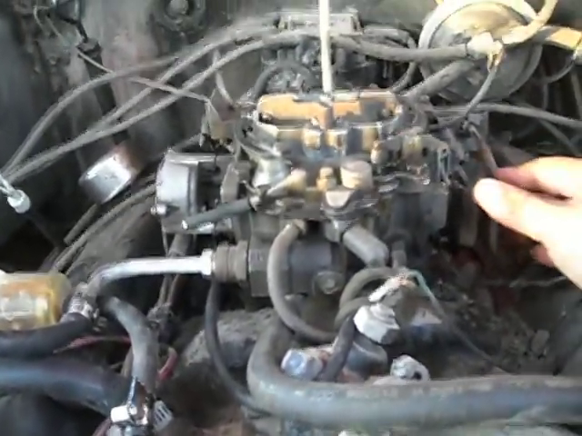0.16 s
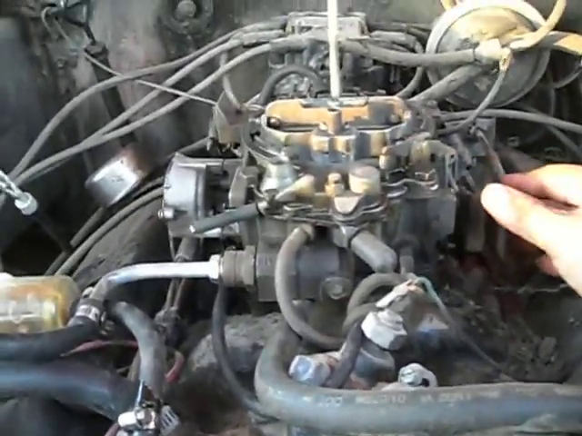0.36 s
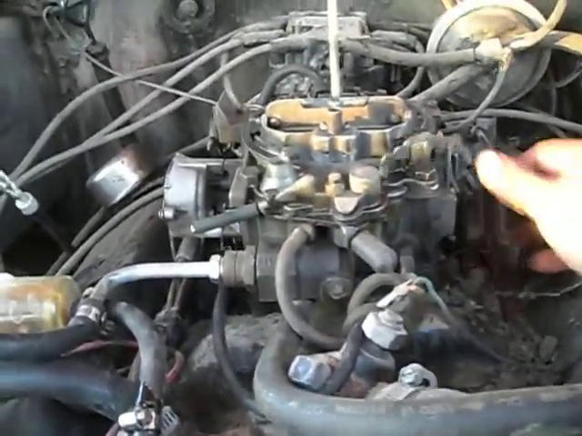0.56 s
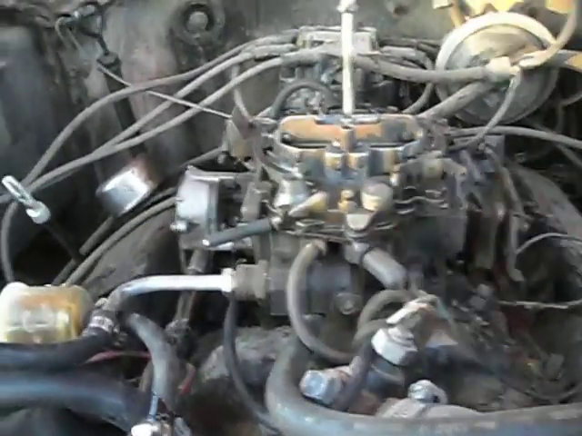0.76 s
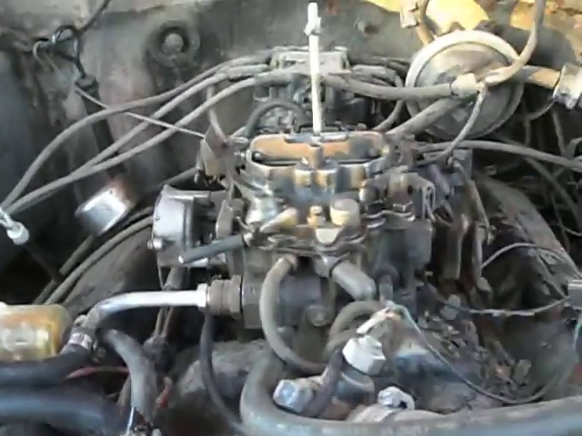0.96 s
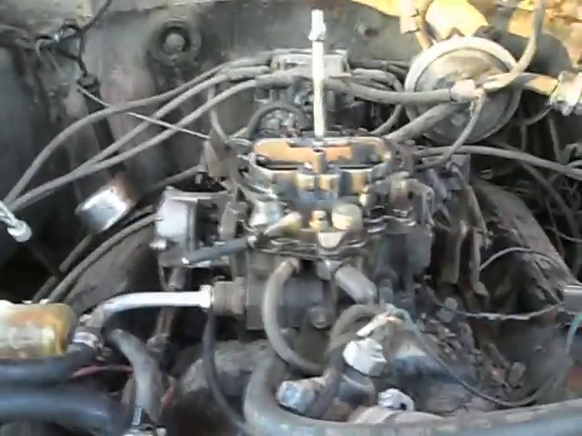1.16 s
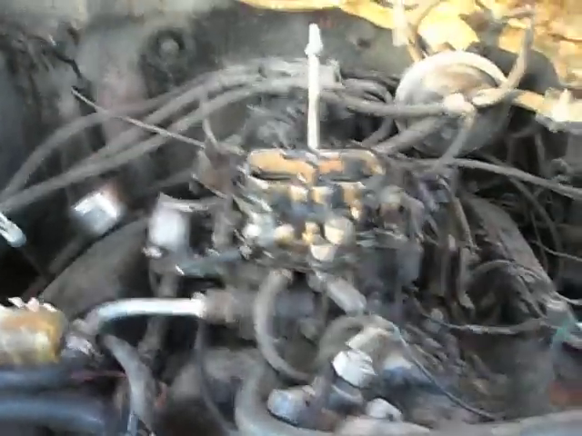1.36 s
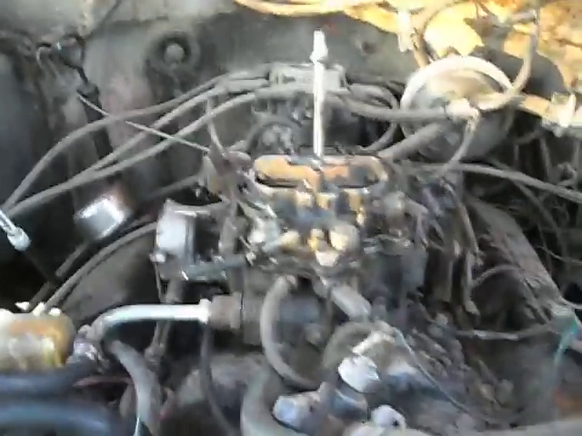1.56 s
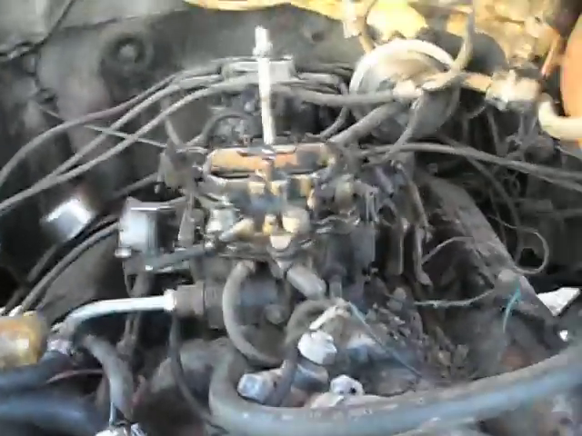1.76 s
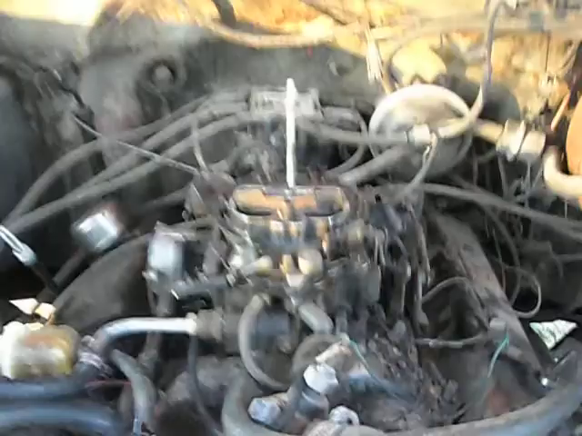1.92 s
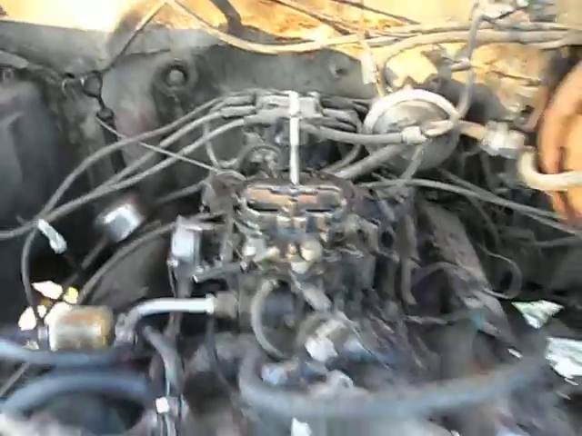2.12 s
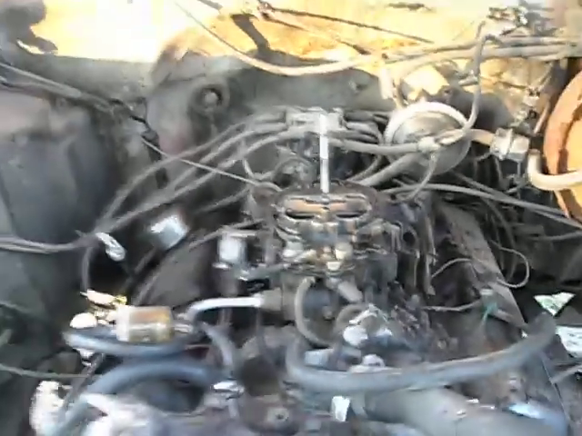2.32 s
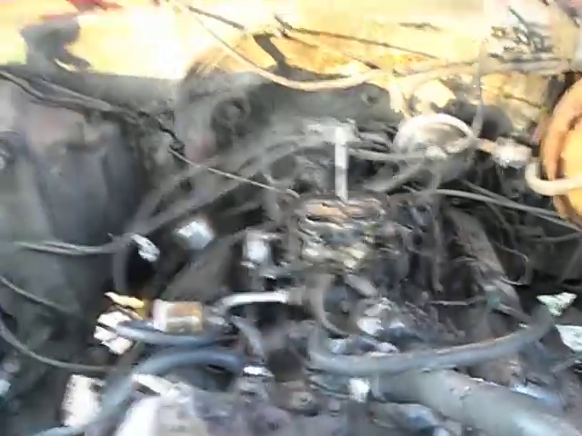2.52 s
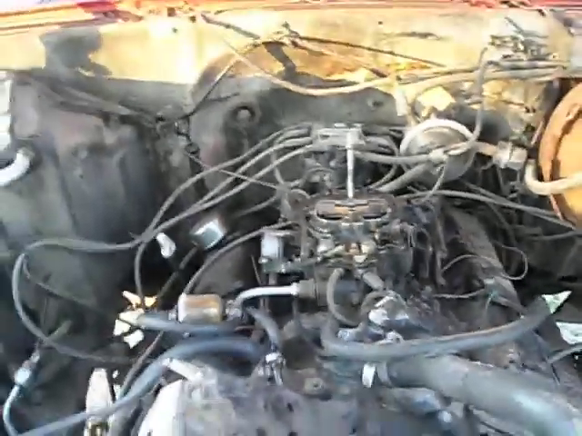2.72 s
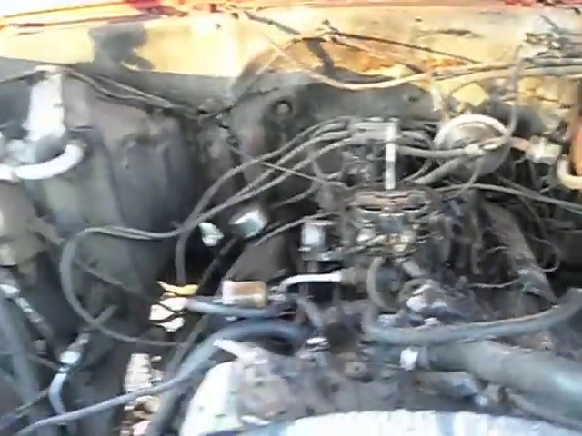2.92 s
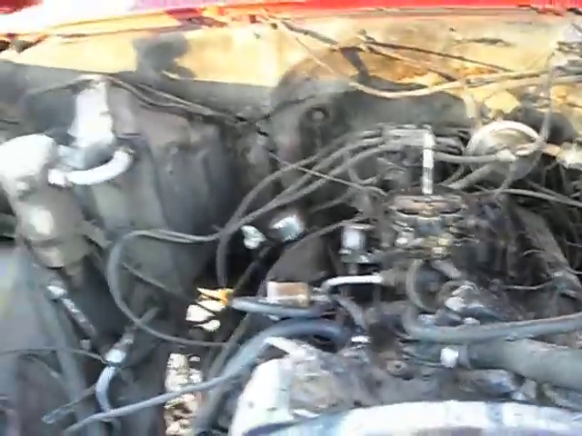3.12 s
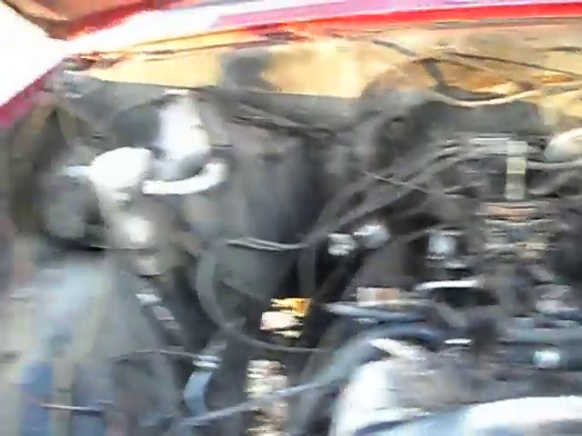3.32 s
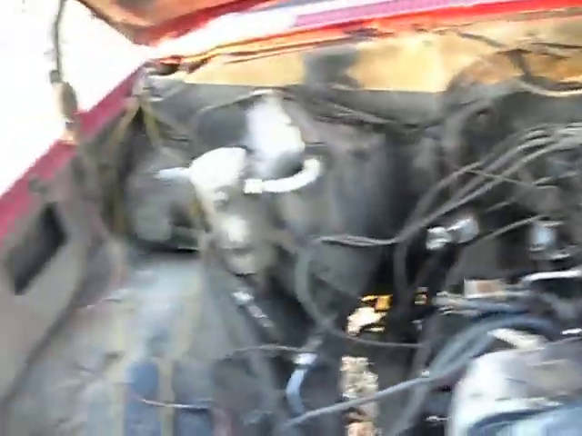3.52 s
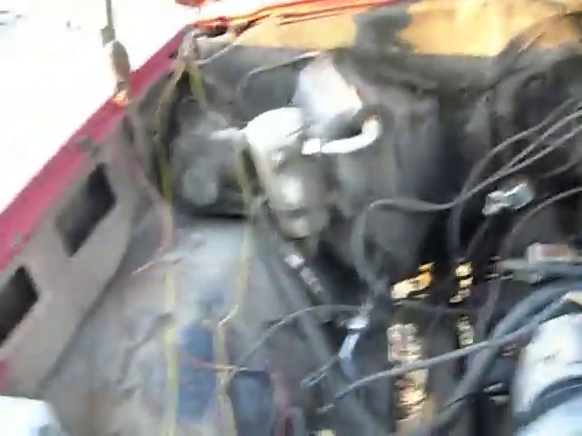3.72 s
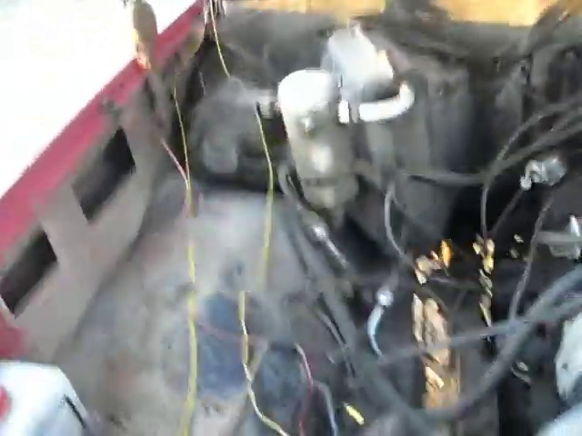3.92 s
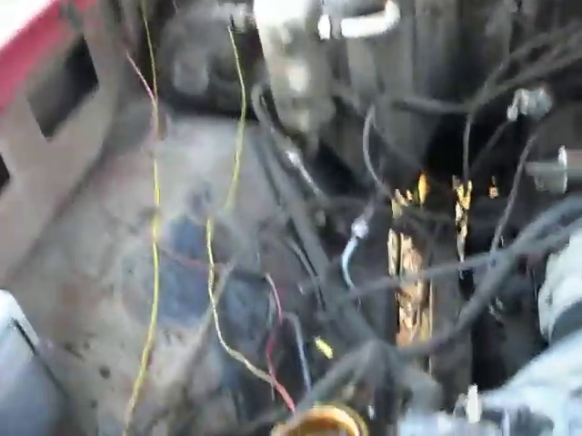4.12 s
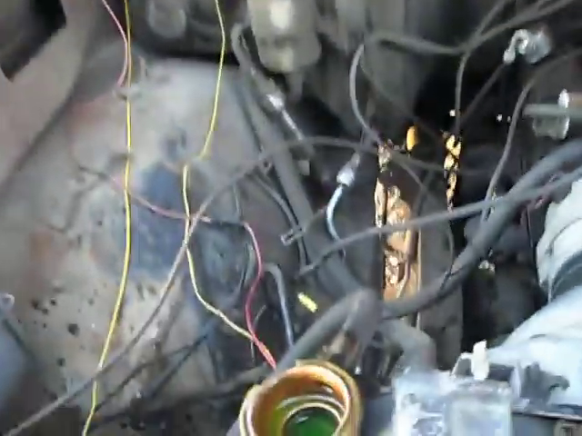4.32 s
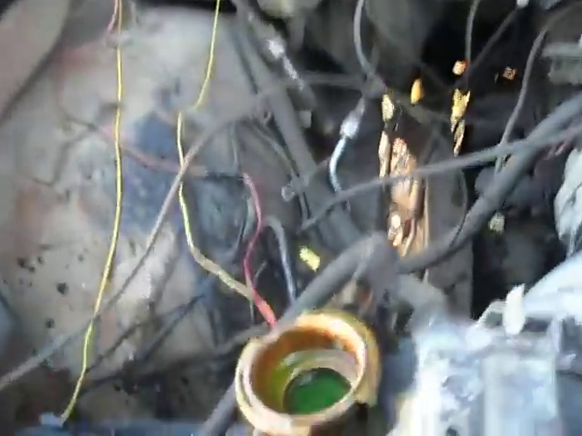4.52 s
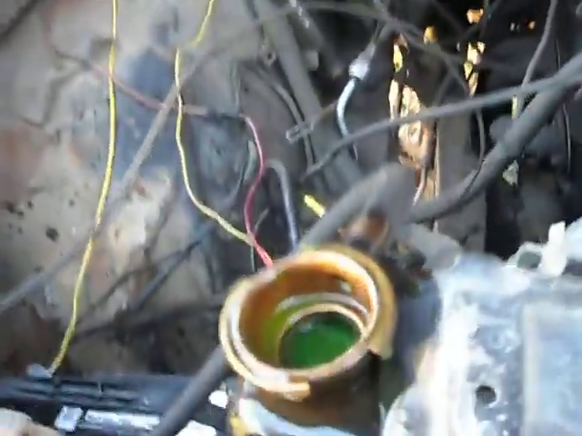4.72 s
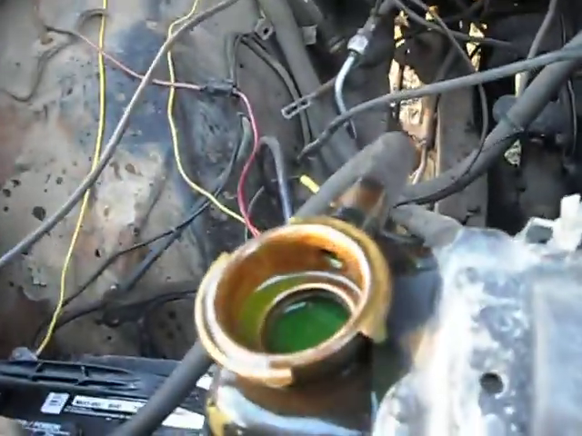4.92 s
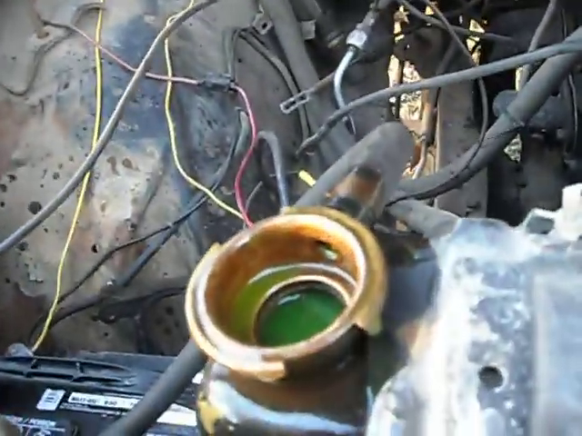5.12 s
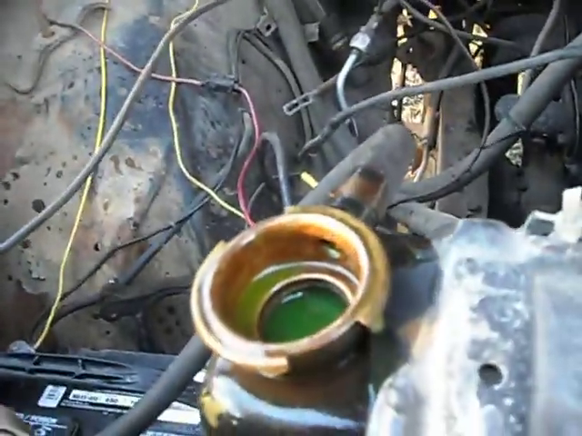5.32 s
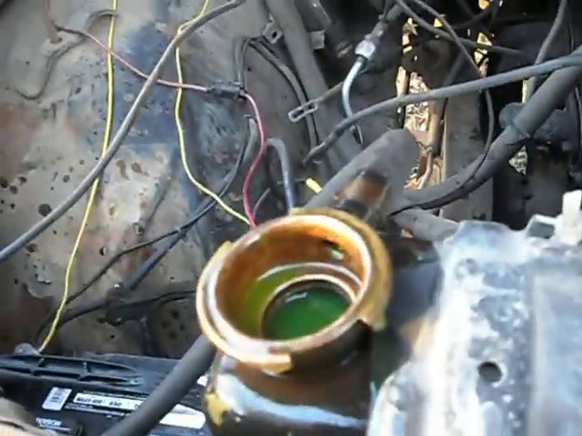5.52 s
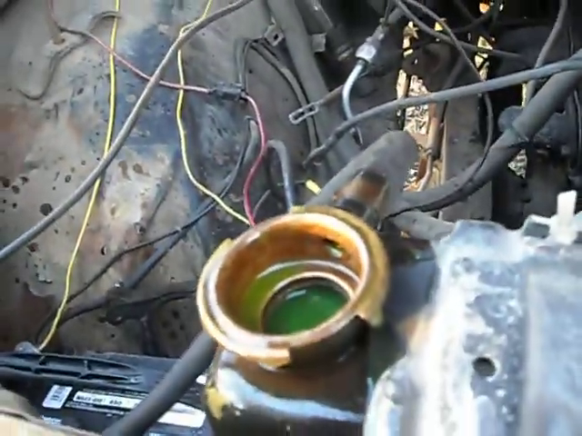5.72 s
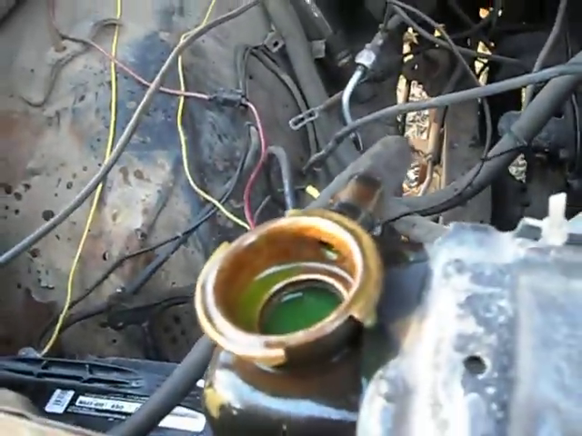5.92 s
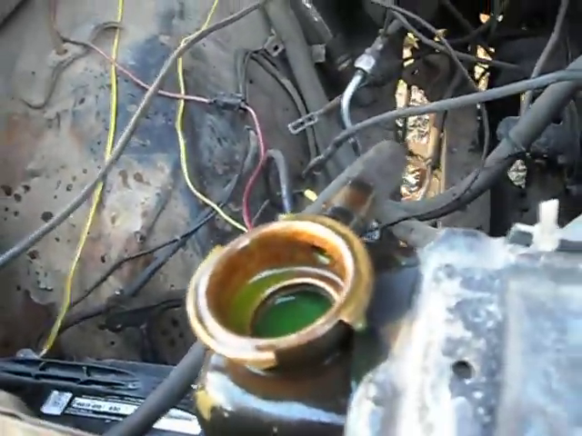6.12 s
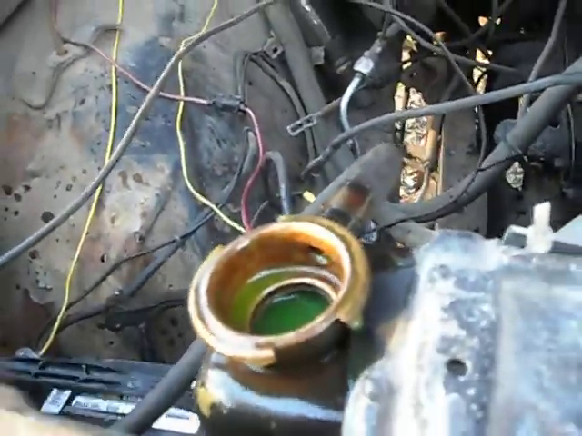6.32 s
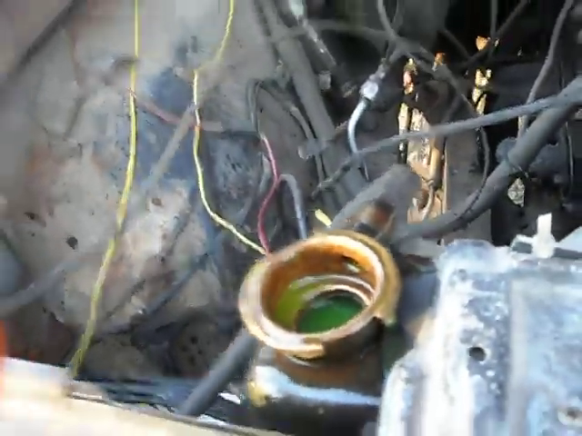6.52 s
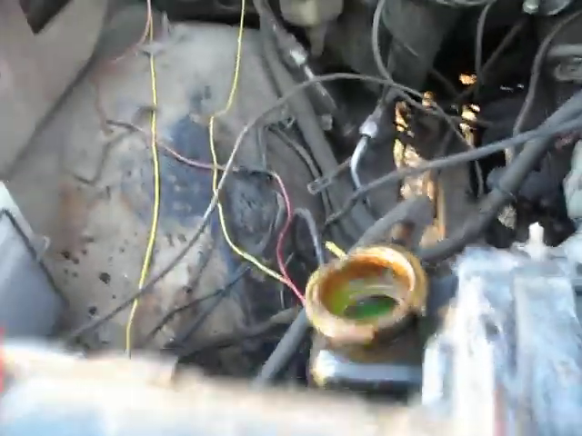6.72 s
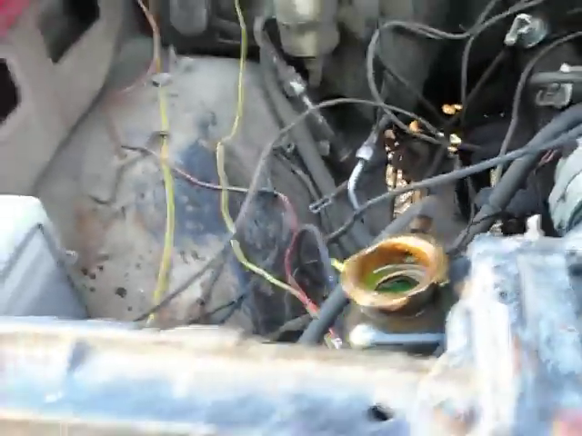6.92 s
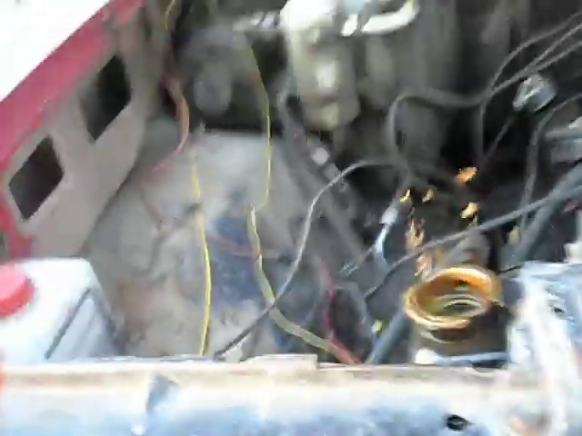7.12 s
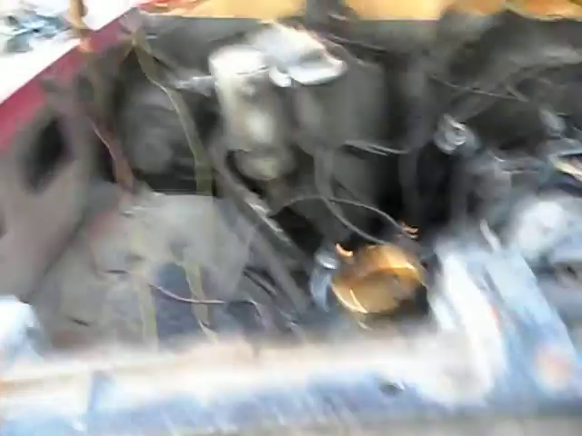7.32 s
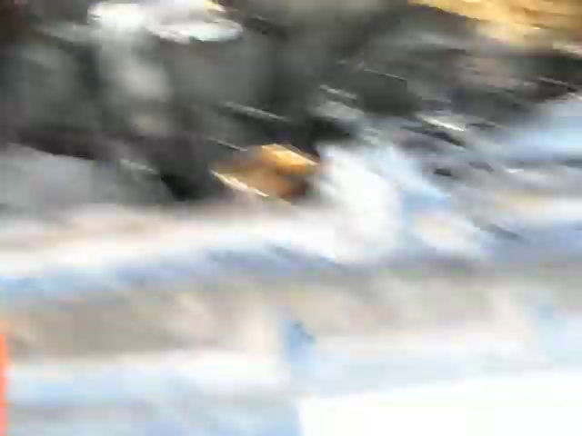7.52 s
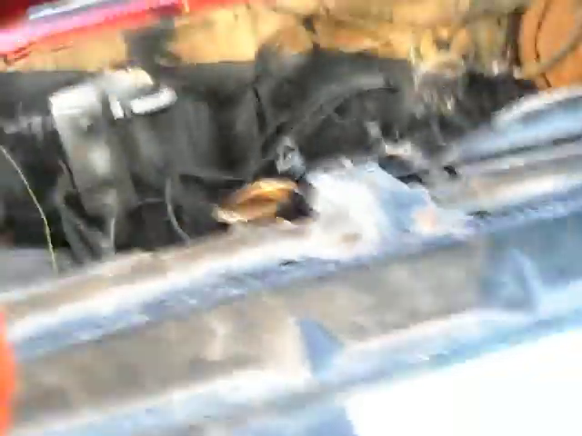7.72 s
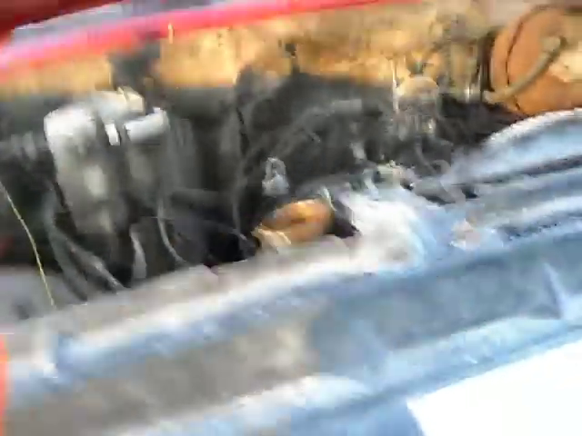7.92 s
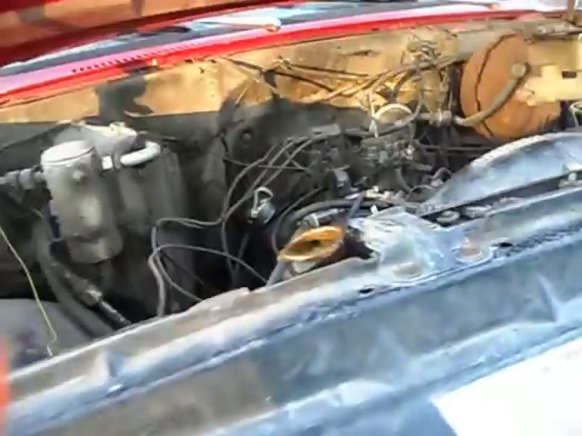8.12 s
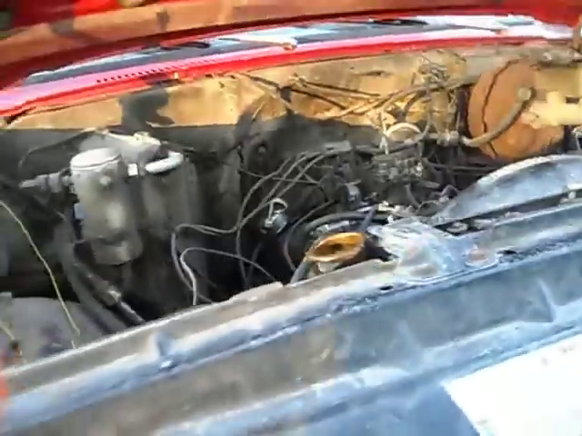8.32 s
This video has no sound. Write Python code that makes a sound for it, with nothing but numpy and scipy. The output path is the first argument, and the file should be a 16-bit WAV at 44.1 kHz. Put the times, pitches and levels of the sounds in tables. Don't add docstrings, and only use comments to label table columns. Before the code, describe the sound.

Close in an open engine bay, a big petrol V8 gets two short throttle blips, each a throaty roar with a bright gulp of air. Pops and crackles follow as revs fall, then a deep, lumpy idle throbs steadily with body knocks, carburettor hiss and faint whistles. The small handheld microphone distorts on the blips and dips in level after strong beats.

```python
import sys
import numpy as np
from scipy import signal
from scipy.io import wavfile
from scipy.ndimage import uniform_filter1d, minimum_filter1d

SR = 44100
rng = np.random.default_rng(int(sys.argv[2]) if len(sys.argv) > 2 else 0)


def transcribe(u):
    v = np.clip(np.atleast_2d(u).T, -1, 1)
    q = np.round(v * 32767).astype(np.int16)
    wavfile.write(sys.argv[1], SR, q)


def volts_from_db(level):
    exponent = np.asarray(level, float) / 20
    return 10 ** exponent


N = 373086
SECONDS = np.arange(N) / SR
IDLE_FIRING_HZ = 63


def rms_one(x):
    return x / np.sqrt(np.mean(x ** 2) + 1e-20)


def in_time(rows):
    s, *columns = np.transpose(rows)
    return [np.interp(SECONDS, s, c) for c in columns]


def noise():
    return rng.standard_normal(N)


def butter(x, hz, kind, order=2):
    return signal.sosfilt(signal.butter(order, hz, kind, fs=SR, output="sos"), x)


def resonate(x, hz, width_hz):
    r = np.exp(-np.pi * width_hz / SR)
    gain = (1 - r * r) / 2
    return signal.lfilter([gain, 0, -gain], [1, -2 * r * np.cos(2 * np.pi * hz / SR), r * r], x)


def sliding(x, hz, width_hz):
    r, out, state = np.exp(-np.pi * width_hz / SR), np.zeros(N), np.zeros(2)
    for i in range(0, N, 512):
        a = [1, -2 * r * np.cos(2 * np.pi * hz[i] / SR), r * r]
        out[i:i + 512], state = signal.lfilter([1, 0, -1], a, x[i:i + 512], zi=state)
    return rms_one(out)


def drift(rate):
    knots = rng.standard_normal(int(N / SR * 60) + 2)
    knots = rms_one(signal.lfilter([1], [1, -np.exp(-2 * np.pi * rate / 60)], knots))
    return np.interp(SECONDS * 60, np.arange(len(knots)), knots)


def coloured(spectrum, patchy_db):
    hz, level_db = np.transpose(spectrum)
    edges = np.geomspace(hz[0], hz[-1], int(2.3 * np.log2(hz[-1] / hz[0])))
    white, together, out = rng.standard_normal((2, N)), drift(45), 0
    for k, (low, high) in enumerate(zip(edges, edges[1:])):
        band_db = np.interp(np.log(low * high) / 2, np.log(hz), level_db)
        flicker_db = patchy_db * (together + 1.9 * drift(6.9))
        out = out + volts_from_db(band_db + flicker_db) * butter(white[k % 2], [low, high], "band")
    return rms_one(out)


# time in seconds, firings per second.
SPEED = [(0.0, 99.16), (0.12, 122.99), (0.52, 89.85), (0.6, 132.24), (0.7, 126.68), (0.95, 104.48),
         (1.2, 90.39), (1.45, 64.65), (2.1, 62.68), (4.2, 62.39), (4.6, 64.02), (5.24, 62.53),
         (5.85, 64.04), (6.26, 62.59), (6.9, 64.03), (7.28, 62.49), (7.9, 65.52), (8.46, 63.45)]


def firing_count():
    return np.cumsum(in_time(SPEED)[0]) / SR + 7.786


# time in seconds, exhaust pressure over idle in dB, unsettled running 0-1.
RUNNING = [(0, 14, 0.8), (.13, 10, 1), (.2, 15, 1), (.25, 4.5, 0.95), (.5, 9.5, 0.98), (.62, 11.5, 0.9),
           (.75, 10, 1), (.95, 8, 1), (1.1, 10.5, 0.83), (1.2, 4.5, 1), (1.3, 0.5, 0.84), (1.7, -0.5, 0.78),
           (2.0, 0, 0.52), (2.35, 1, 0.28), (3.3, 0.76, 0.11), (7.3, -0.74, 0), (7.85, 2.3, 0.55),
           (8.46, -0.3, 0.1)]


def low_layer(idle_db, follows, unsettled_db):
    pressure_db, unsettled = in_time(RUNNING)
    return idle_db + follows * pressure_db + unsettled_db * unsettled


# widest opening in seconds, strength in dB.
BLIPS = [
    (.03, -2),
    (.615, 0),
]
# seconds from widest opening, intake roar in dB, air rush in dB.
BLIP_SHAPE = [
    (-.16, -40, -53),
    (-.115, -25, -34),
    (-.065, -15, -30.5),
    (-.04, -2.5, -16.5),
    (.03, 2, -16),
    (.06, -5, -29),
    (.17, -5.5, -32.5),
    (.27, -15.5, -39.5),
    (.9, -30, -48.5),
]


def throttle():
    after, *shapes_db = np.transpose(BLIP_SHAPE)
    levels_db = []
    for shape_db in shapes_db:
        each_db = [db + np.interp(SECONDS - s, after, shape_db) for s, db in BLIPS]
        levels_db.append(np.max(each_db, axis=0))
    return levels_db


# frequency in Hz, level in dB per Hz.
ROAR = [(100, -9.5), (170, -4.5), (312, 0), (471, -14.5), (634, -8.5), (680, -10), (806, -11.5),
        (2840, -26.5), (5000, -32.5), (6500, -68), (11000, -120)]
# frequency in Hz, level in dB per Hz.
RUSH = [(880, -31), (1500, -7), (1590, -2), (2150, -13.5), (2600, -10), (7130, -17.5), (9950, -20),
        (11000, -24), (14300, -55), (22000, -120)]


def intake_blip(count):
    roar_db, rush_db = throttle()
    closing = np.clip((1.9 - SECONDS) / 0.85, 0, 1)
    each_db = np.interp(count, np.arange(700), rng.standard_normal(700))
    gulp = volts_from_db(2.5 * np.cos(2 * np.pi * count) + 1.6 * each_db)
    roar = volts_from_db(roar_db - 3.5) * coloured(ROAR, 1.12)
    rush = volts_from_db(rush_db + 3.5) * coloured(RUSH, 0.45)
    start, end = -.13, .06
    corners = [start, start + .015, end, end + .03]
    cracked = sum(np.interp(SECONDS - at, corners, [0, 1, 1, 0]) for at, _ in BLIPS)
    thin = cracked * butter(noise(), 6000, "high", order=4)
    return closing * gulp * (roar + rush) + volts_from_db(-27) * thin


# lag in firing intervals, strength in dB.
CYLINDERS = [(0.38, -6.9), (-0.11, -0.4), (0.24, -13.0), (0.43, -0.6), (0.5, 8.5), (0.22, 6.2), (0.19, 6.4),
             (-0.14, 10.4)]
# frequency in Hz, width in Hz, level in dB, sign.
PIPES = [
    (105.5, 62.6, -5.4, -1),
    (135, 20.5, 0, 1),
    (190, 61.6, -22, 1),
]


def exhaust(count):
    beat_db = low_layer(-22, 0.92, -6)
    tone_db = low_layer(-23, 1.5, -3)
    buffet_db = low_layer(-47, 0.4349, 29.5)
    uneven_db = low_layer(.65, 0, 1.6)
    number = np.arange(8, int(count[-1]) - 1)
    lag, strength_db = np.array(CYLINDERS)[number % 8].T
    chance = rng.standard_normal((len(number), 2))
    at = np.interp(number, count, np.arange(N)).astype(int)
    late = (lag + 0.017 * uneven_db[at] * chance[:, 0]) * SR / IDLE_FIRING_HZ
    puffs = np.full(N, 1e-18)
    arrival = np.clip(at + late.astype(int), 0, N - 1)
    np.add.at(puffs, arrival, volts_from_db(strength_db + uneven_db[at] * chance[:, 1]))
    puffs = signal.fftconvolve(puffs, np.hanning(151), "same") / in_time(SPEED)[0]
    pipes = sum(sign * volts_from_db(db) * resonate(puffs, hz, width) for hz, width, db, sign in PIPES)
    beat = rms_one(butter(pipes, 80, "high", order=4))
    swell = np.sqrt(2) * volts_from_db(0.67 * uneven_db * drift(4.5))
    tone = swell * np.cos(2 * np.pi * count + 0.42 * drift(4.6))
    buffet = rms_one(butter(noise(), [20, 60], "band"))
    return volts_from_db(beat_db) * beat + volts_from_db(tone_db) * tone + volts_from_db(buffet_db) * buffet


# time in seconds, nearness to the carburettor in dB,
# nearness to the block in dB.
LISTENER = [(1.2, 1.5, 5.5), (1.6, 0.5, 2), (3.7, 0, 0.5), (4.5, -1, 1.5), (5.5, -1.2, 1.5),
            (6.8, -2, -0.5), (7.75, -2, 3), (8.46, -4.5, 0)]
# firing number, frequency in Hz, level in dB,
# share of nearness to the carburettor.
KNOCKS = [
    (.45, 212, -36, 2.4),
    (5.4, 200, -43, 0.1),
    (5.2, 162, -40, 0.1),
    (2.0, 163.5, -38, .1),
]


def shake(count):
    boom_db = low_layer(-29.5, 1.0, 5)
    six_db = low_layer(-59, 2.5, 14.5)
    once_db = low_layer(-64, 1.1, 14)
    number = np.arange(8, int(count[-1]))
    share = np.interp(number / IDLE_FIRING_HZ, [2.3, 2.9], [.4, .8])
    strength = volts_from_db(share * np.array(CYLINDERS)[number % 8, 1])
    pushes = np.full(N, 1e-18)
    pushes[np.searchsorted(count, number)] = strength * rng.choice([-1, 1], len(number))
    boom = rms_one(resonate(resonate(pushes, 87, 26), 90, 50))
    six = volts_from_db(six_db) * np.cos(2 * np.pi * count * 6 / 8)
    once = volts_from_db(once_db) * np.cos(2 * np.pi * count / 8)
    out = volts_from_db(boom_db) * boom + np.sqrt(2) * (six + once)
    cycles = np.arange(1, int(count[-1] / 8))
    receding_db = np.minimum(in_time(LISTENER)[0], 0)
    for firing, hz, db, follows in KNOCKS:
        taps, chance = np.full(N, 1e-18), rng.standard_normal((len(cycles), 2))
        taps[np.searchsorted(count, 8 * cycles + firing + .04 * chance[:, 0])] = volts_from_db(1.8 * chance[:, 1])
        knock = rms_one(resonate(resonate(taps, hz, 30), hz, 49))
        out += volts_from_db(db + follows * receding_db) * knock
    return out


# start in seconds, peak level in dB, brightness in Hz.
POPS = [(.275, -1, 3200), (.305, -14, 1300), (.442, -10.5, 3500), (.475, -12, 900), (.70, -9, 2000),
        (.742, -10, 1500), (.768, -7, 1200), (.812, -8, 1400), (.852, -11, 1200), (.907, -12, 1200),
        (1.007, -14, 900), (1.025, -13, 2200), (1.048, -13, 900), (1.091, -10, 4200), (1.144, -15, 4000),
        (1.158, -16, 1400), (1.187, -19, 1500), (1.237, -13, 1100), (1.335, -19, 1400), (1.376, -12, 800),
        (1.424, -21, 2200), (1.445, -18, 900), (1.489, -18, 1500), (1.507, -21, 1500), (1.560, -19, 800),
        (1.66, -23, 700), (1.762, -19, 700), (1.789, -20, 600), (1.81, -22, 600), (1.877, -20, 900)]


def pops():
    out, s = np.zeros(N), np.arange(2600) / SR
    for start, peak_db, bright_hz in POPS:
        length = .005 * np.exp((peak_db + 15) / 25)
        shape = np.exp(-s / length) * (1 - np.exp(-s / (.4 * length)))
        low_noise = butter(rng.standard_normal(len(s)), [230, 500], "band", order=1)
        burst = butter(low_noise * shape, 1.6 * bright_hz, "low")
        thump = 0.36 * shape / shape.max() * np.sin(2 * np.pi * 260 * s)
        early_db = 3.5 if start < 1.2 else 0
        first = int((start - .002 - .3 * length) * SR)
        out[first:][:len(s)] += volts_from_db(peak_db + early_db) * (burst / np.abs(burst).max() + thump)
    return out


# frequency in Hz, level in dB per Hz.
RUMBLE = [(150, -38), (260, 1), (345, -0.5), (419, -3.5), (654, -4.5), (1010, -12.5), (1430, -17),
          (1690, -24), (2000, -14), (2600, -38), (4400, -120)]
# frequency in Hz, level in dB per Hz.
HISS = [(710, -15), (1200, -6.5), (1710, -16), (2300, -2.5), (3090, -4.5), (3930, -6), (5240, -7.5),
        (9570, -6.5), (11000, -36.5), (14300, -49), (22000, -120)]
# frequency in Hz, width in Hz, level in dB.
VENTURI = [(6130, 300, -52), (7280, 150, -61.5), (3340, 85, -53.5), (2786, 42, -55), (667, 25, -46),
           (363, 37, -58)]
# time in seconds, upper and lower frequency in Hz.
BAY = [(1.2, 3960, 2240), (2.01, 3700, 2380), (2.21, 3580, 2280), (2.59, 3960, 2250), (3.26, 3840, 2370),
       (3.87, 3940, 2276), (7.2, 3920, 2303), (7.49, 4040, 2350), (7.81, 3740, 2320)]


def idle_noise(count):
    carb_db, block_db = in_time(LISTENER)
    rumble_db, hiss_db, top_db = -41 + block_db, -41 + carb_db, -52.5 + 3.7 * carb_db
    settled = np.clip((SECONDS - .9) / .5, 0, 1)
    rumble = coloured(RUMBLE, 0.46) * volts_from_db(0.27 * np.cos(2 * np.pi * (count - .2)))
    air = rng.standard_normal((3, N))
    whistle = sum(volts_from_db(db) * rms_one(resonate(air[0], hz, width)) for hz, width, db in VENTURI)
    upper_hz, lower_hz = in_time(BAY)
    lower_db = np.interp(SECONDS, [4.0, 4.8, 6.6, 7.2], [-7.5, -4, -4, -6.5])
    upper = volts_from_db(-3.5 + 1.5 * drift(6)) * sliding(air[1], upper_hz, 370)
    lower = volts_from_db(lower_db + 1.5 * drift(6)) * sliding(air[2], lower_hz, 100)
    broad = coloured(HISS, 0.86)
    top = butter(broad, 5200, "high")
    ridge = volts_from_db(-6) * rms_one(resonate(air[0], 9800, 260))
    ridge = ridge + volts_from_db(-13) * rms_one(resonate(air[0], 8300, 200))
    hiss = volts_from_db(hiss_db - 2.5) * (broad - top + upper + lower)
    hiss = hiss + volts_from_db(top_db + 1.0) * (rms_one(top) + ridge)
    return settled * (volts_from_db(rumble_db + 2.0) * rumble + hiss + volts_from_db(hiss_db + 37.5) * whistle)


# start and end in seconds,
# frequency in Hz, width in Hz, level in dB.
HOLLOWS = [
    (3.15, 4, 318, 20, -45),
    (2.1, 2.7, 560, 28, -50),
    (5.44, 6.6, 1380, 45, -55),
    (4.84, 6.3, 352, 36, -45),
]


def hollows():
    air, out = noise(), 0
    for start, end, hz, width, db in HOLLOWS:
        corners = [start - .2, start + 0.14, end - .1, end + 0.095]
        passing = np.interp(SECONDS, corners, [0, 1, 1, 0])
        out = out + volts_from_db(db + 3.4 * drift(14)) * passing * rms_one(resonate(air, hz, width))
    return out


def scene():
    count = firing_count()
    blips_and_beat = intake_blip(count) + exhaust(count) + shake(count)
    return (blips_and_beat + pops() + idle_noise(count) + hollows())[None]


# time in seconds, depth in dB.
DUCKS = [(2.07, 4), (2.33, 3), (2.6, 2.5), (2.97, 5.5), (3.23, 4.5), (3.5, 2.5), (3.62, 1.5), (3.87, 4),
         (4.12, 3.5), (4.5, 2), (4.78, 6), (4.9, 3), (5.4, 2), (5.68, 3), (6.05, 4.5), (6.3, 1.5),
         (6.55, 3), (6.8, 3.5), (7.06, 4.5), (7.3, 3.5), (7.53, 5), (7.66, 3), (7.93, 5), (8.17, 4)]


def gain_control():
    loudest_firing, recovery_db_per_s = 7.12, 26
    count, duck_db = firing_count(), np.zeros(N)
    for near, depth_db in DUCKS:
        cycle = np.round((count[int(near * SR)] - loudest_firing) / 8)
        duck_db[np.searchsorted(count, 8 * cycle + loudest_firing)] = .9 * depth_db
    climb_db = recovery_db_per_s * SECONDS
    held_db = np.maximum.accumulate(duck_db + climb_db) - climb_db
    r = np.exp(-1 / (0.006 * SR))
    return volts_from_db(-signal.lfilter([1 - r], [1, -r], held_db))


def roll_off(x):
    return signal.sosfilt(signal.butter(12, 15700, fs=SR, output="sos"), x)


def record(dry):
    x = dry * gain_control()
    peak = -minimum_filter1d(-np.abs(x), size=900, axis=1)
    crest = uniform_filter1d(peak, size=900, axis=1)
    limited = x * np.minimum(1, 1.0 / crest) ** .8
    x = butter(limited, 9950, "low", order=10)
    overload = .71
    mix = np.clip(x, -overload, overload)
    return roll_off(mix)


dry = scene()
out = record(dry)
transcribe(out)
```